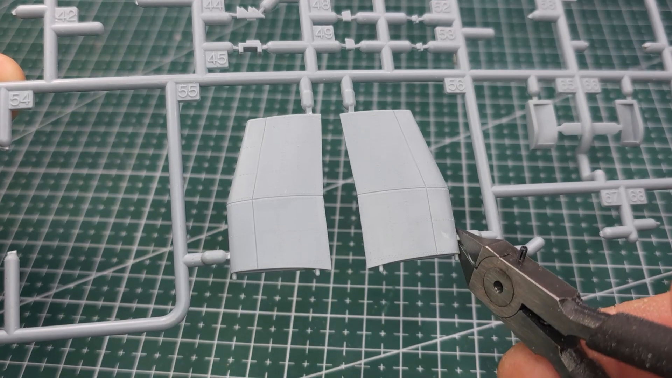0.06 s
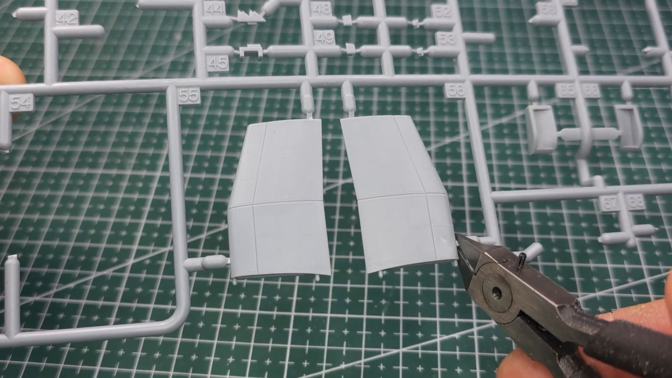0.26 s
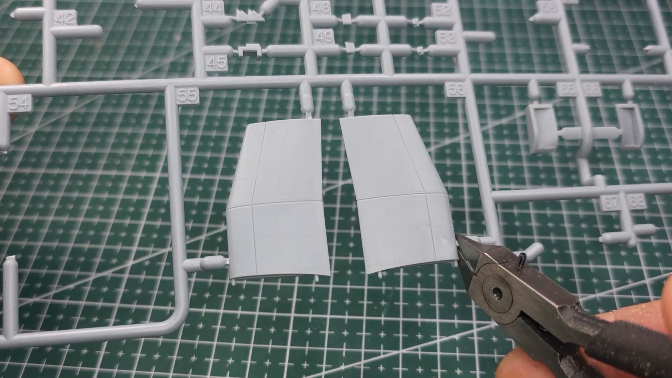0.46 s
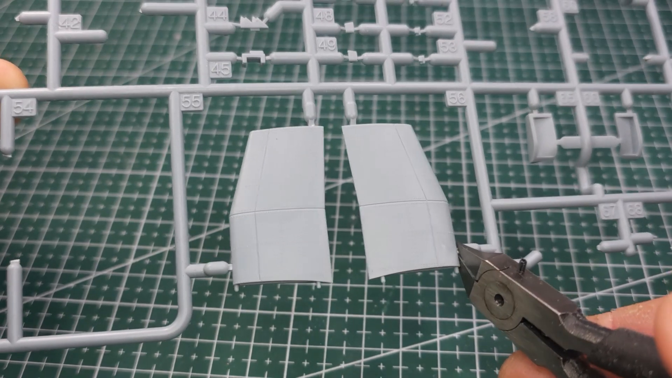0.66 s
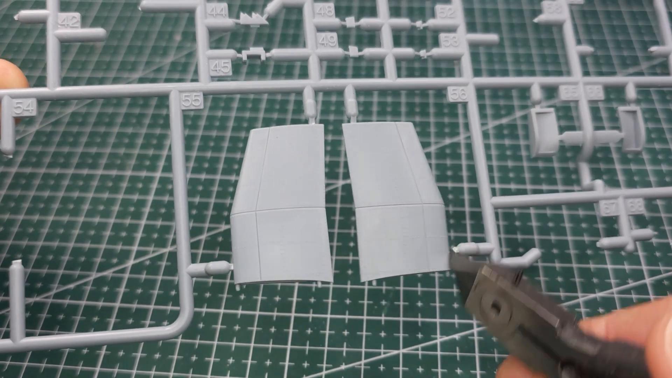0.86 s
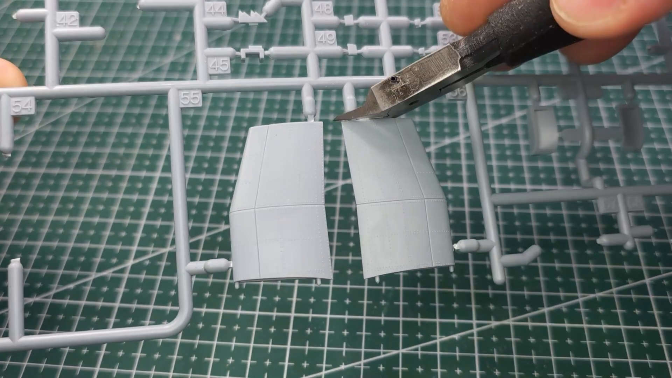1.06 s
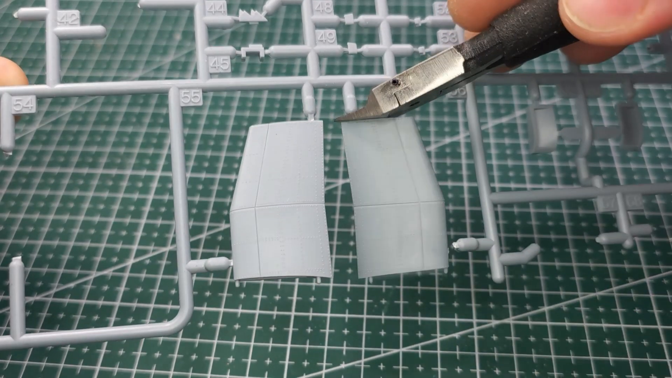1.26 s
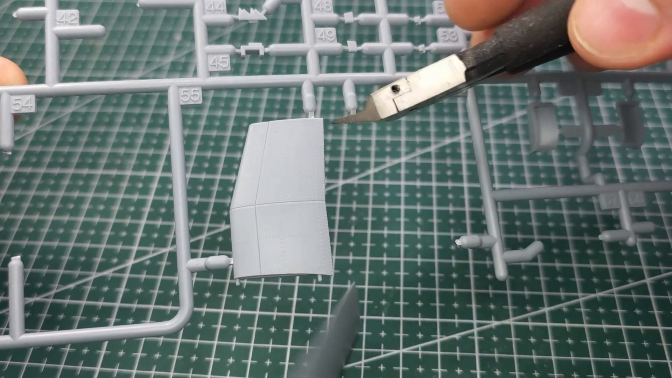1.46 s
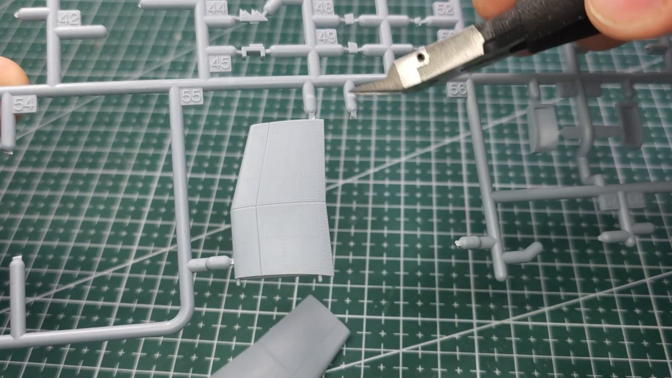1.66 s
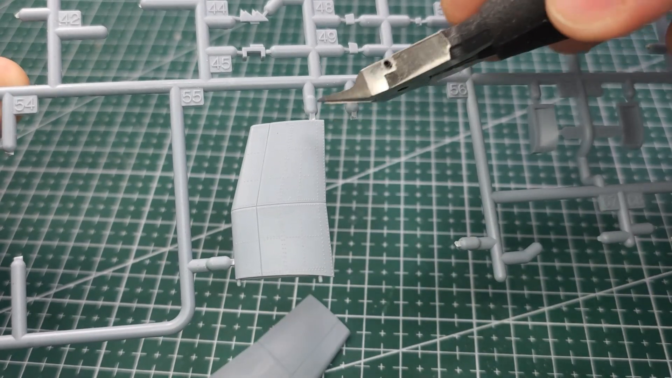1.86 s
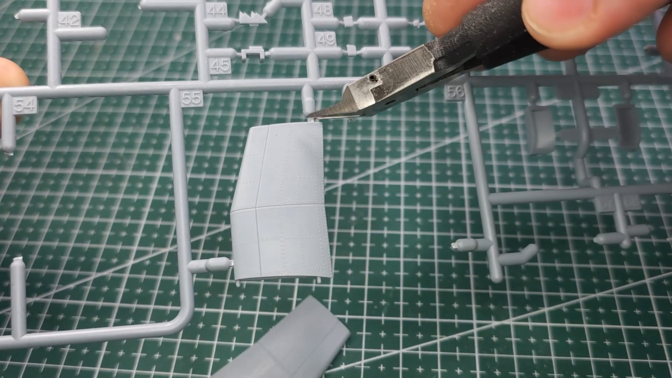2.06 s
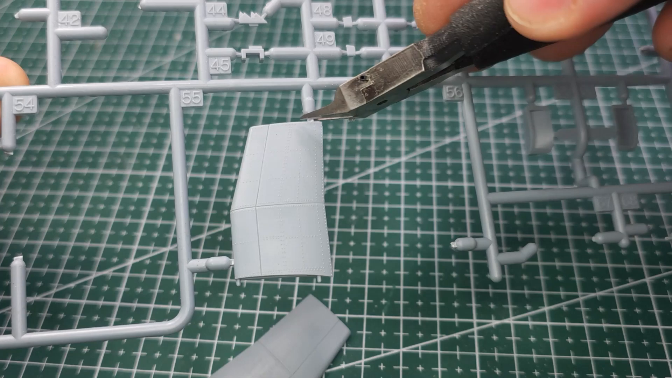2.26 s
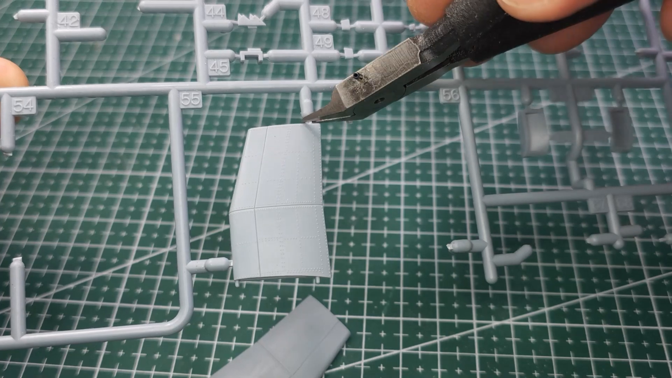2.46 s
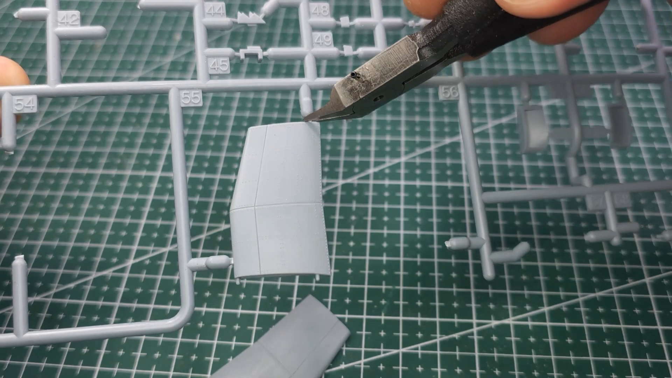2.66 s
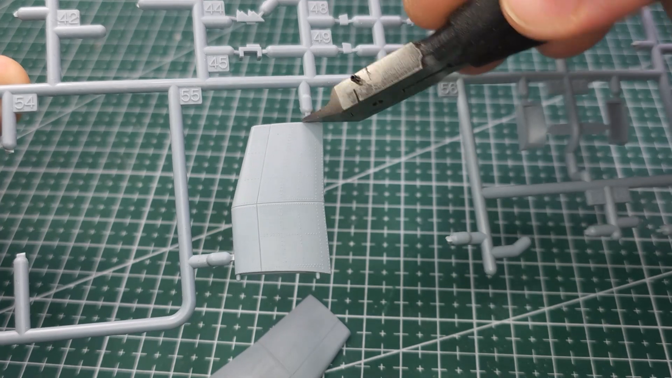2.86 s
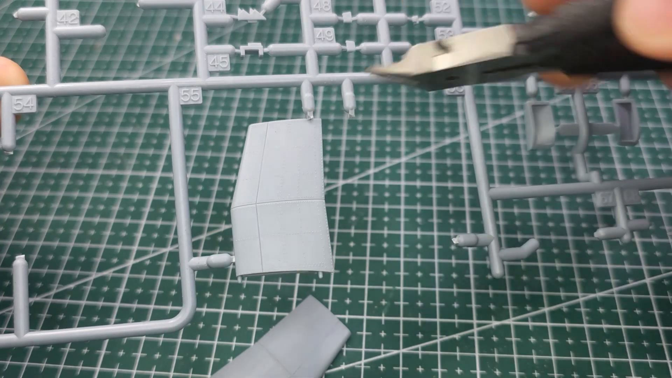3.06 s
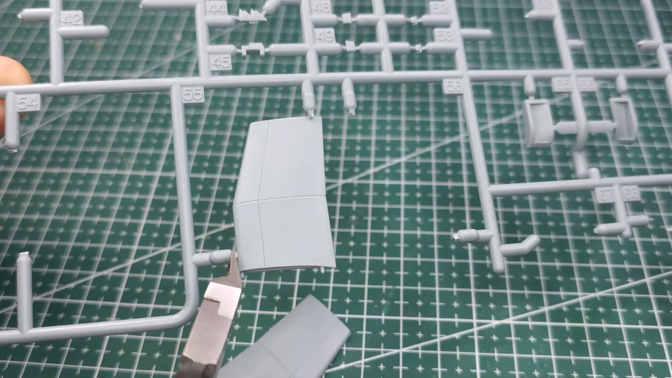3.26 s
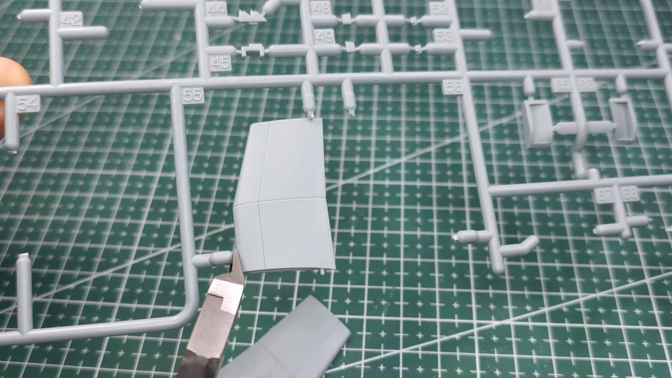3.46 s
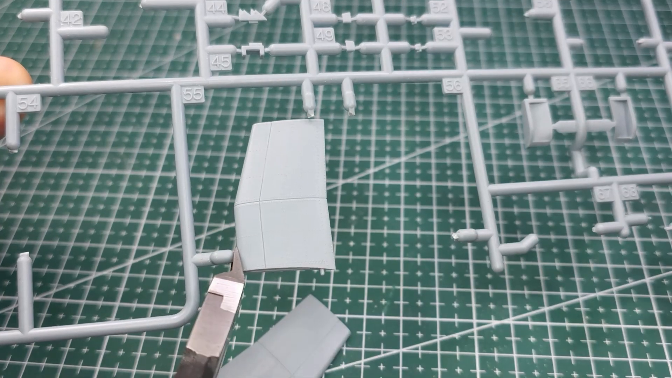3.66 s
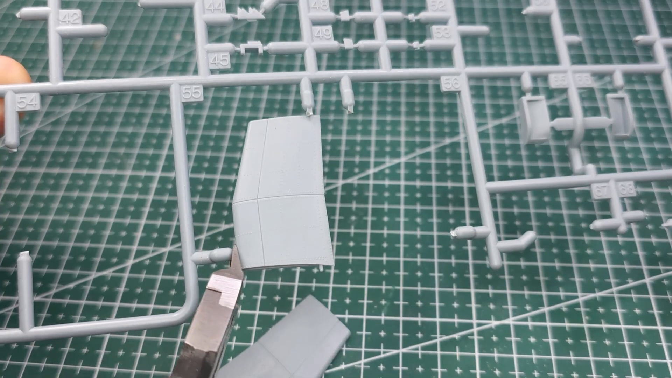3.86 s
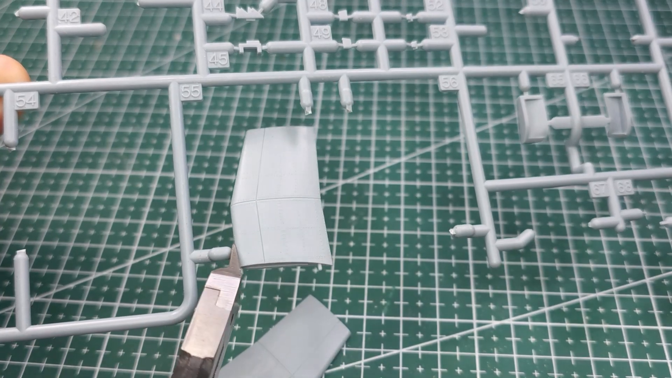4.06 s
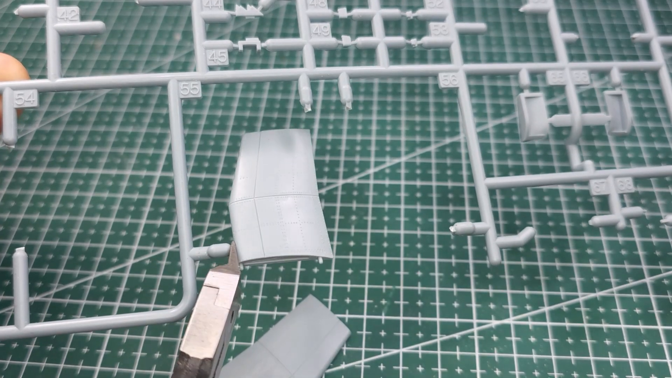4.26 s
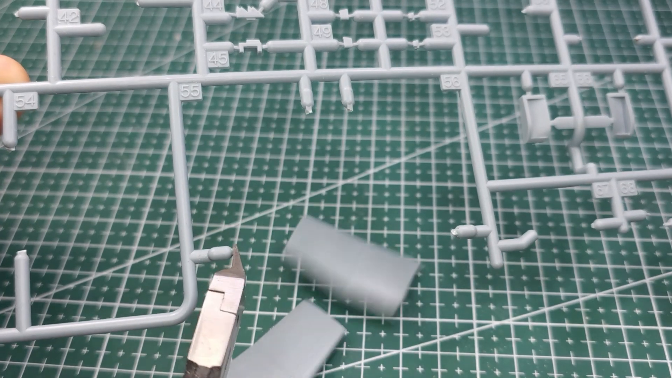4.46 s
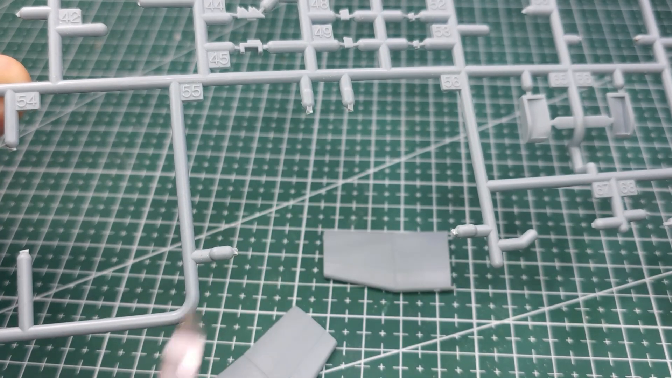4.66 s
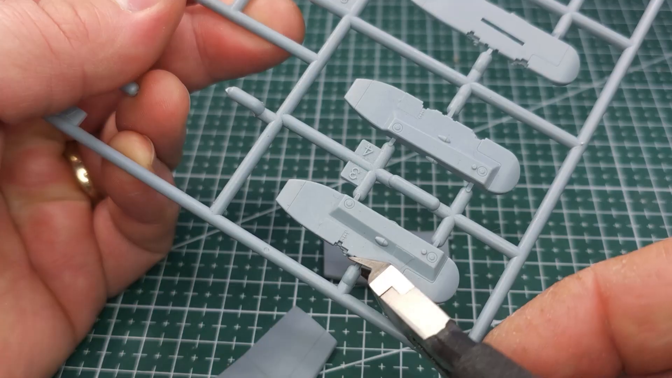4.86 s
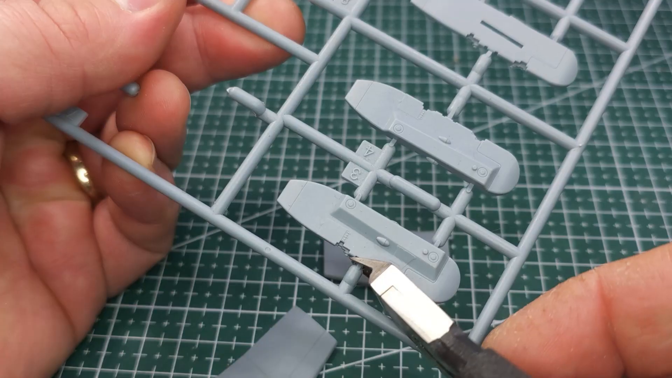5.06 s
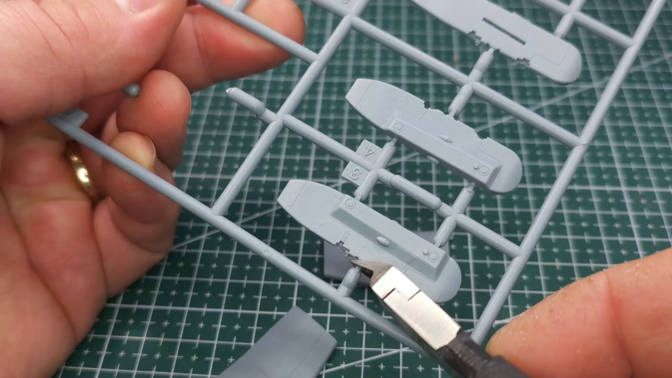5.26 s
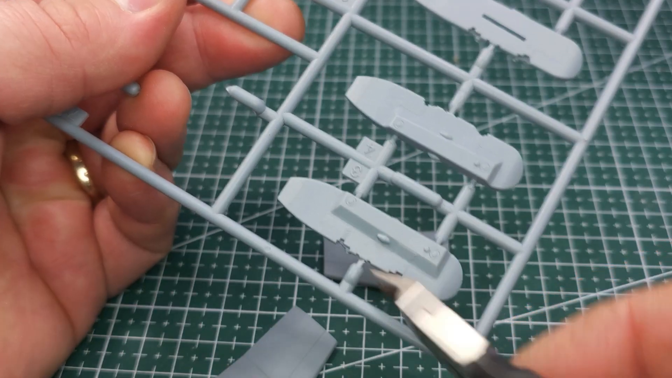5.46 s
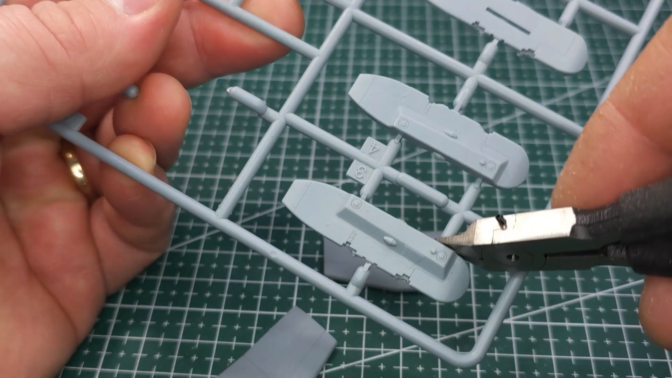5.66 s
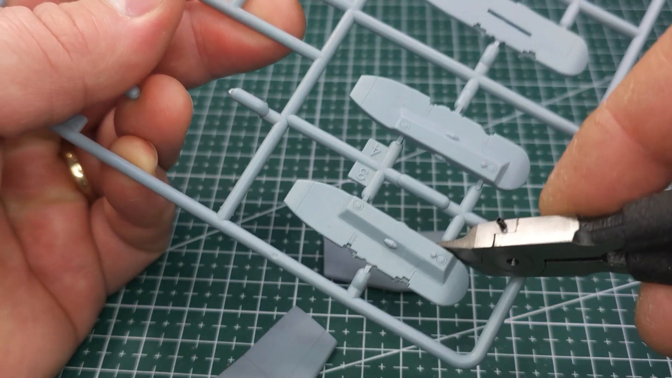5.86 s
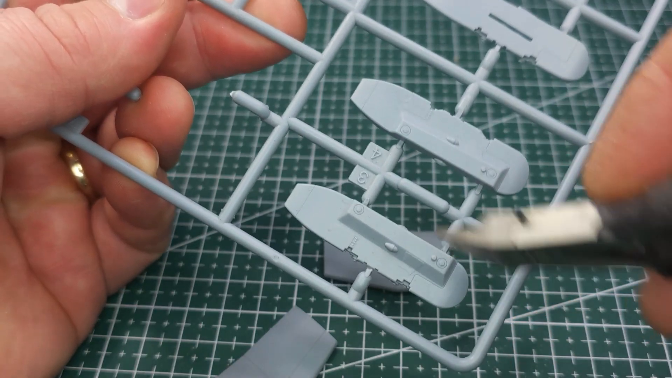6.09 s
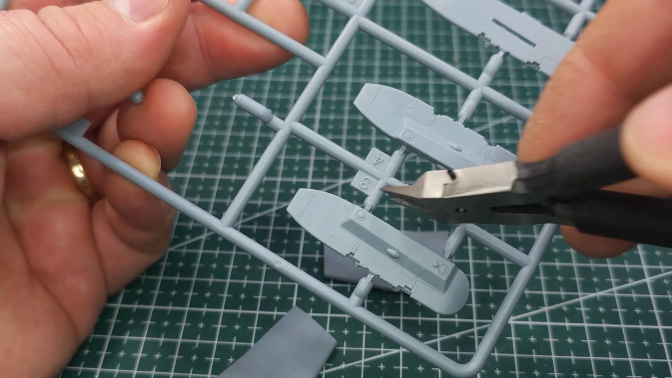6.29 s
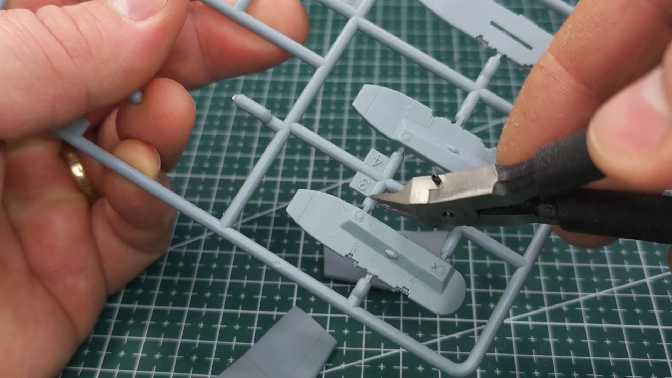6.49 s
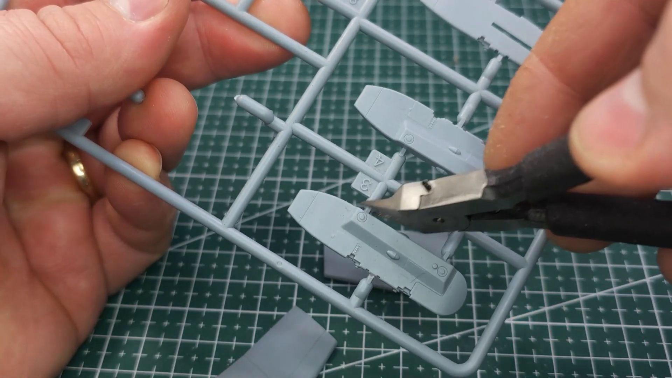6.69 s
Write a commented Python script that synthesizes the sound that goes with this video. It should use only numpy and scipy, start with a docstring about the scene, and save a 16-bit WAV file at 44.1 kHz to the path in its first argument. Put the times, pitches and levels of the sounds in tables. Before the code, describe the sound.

Seven crisp, unevenly spaced snaps sound as cutters break through a plastic parts frame, each with a slight rattle and a soft bump on the desk. After the second and fourth cuts, a light plastic panel bounces briefly on a mat. The jaws tick and scrape faintly in between, and the final cuts are weaker. The microphone is close, in a small room with a faint, steady rumble.

```python
"""Side cutters snip plastic parts off their frame, over a cutting mat in a small, quiet room. A low rumble runs
throughout. The jaws brush the plastic, then the first cut creaks and cracks, shaking the frame and thumping the
desk. After the second cut a freed panel drops and clatters on the mat. Two more cuts follow and a second panel
falls. Three last cuts end the scene. Between cuts the jaws brush and tick against the plastic, close to a
stereo microphone, and a faint tick sounds now and then."""
import sys
import numpy as np
from scipy import signal
from scipy.fft import rfft, irfft
from scipy.io import wavfile
from scipy.ndimage import uniform_filter1d

SR = 44100
rng = np.random.default_rng(int(sys.argv[2]) if len(sys.argv) > 2 else 0)


def store_pcm(level_fs):
    """Save levels as 16-bit WAV."""
    pcm = np.round(np.clip(level_fs, -1, 1) * 32767).astype(np.int16)
    wavfile.write(sys.argv[1], SR, np.atleast_2d(pcm).T)


N = 296793
LEN = 8192  # samples set aside for one short sound
T = np.arange(LEN) / SR

# The tone of the room's rumble. Each row: frequency in Hz, relative level in dB.
RUMBLE_TONE = [(12, -37.5), (20, -6), (62, 0.5), (87, -6), (196, -12), (260, -19.5), (291, -27.5),
               (326, -24.5), (444, -31), (541, -38), (588, -39.5), (1980, -53.5), (16800, -65)]
# How alike the rumble is in both microphones. Each row: frequency in Hz, likeness from 0 to 1.
RUMBLE_LIKENESS = [(60, .98), (130, .94), (290, .68), (640, 0.09), (1400, 0.089)]
# Jaws or fingers brush the plastic; the last row is a longer crunch of the cut at 6.508 s. Each row: time in
# seconds, peak in dB, centre pitch in Hz, width in octaves, fade time in seconds. A fade time (t60) is how long
# a sound takes to fall 60 dB.
BRUSHES = [(.63, -79.5, 5830, 5.1, .05), (0.934, -54.5, 3830, 6.1, 0.17), (2.929, -39, 2540, 2.9, 0.069),
           (3.09, -76, 12500, 1.3, 1), (3.520, -68, 7000, 0.75, 0.06), (4.786, -65, 10030, 1.33, .3),
           (5.437, -60, 10020, 1.5, 0.15), (5.964, -56, 8020, 2.2, .15), (6.518, -36.5, 1524, 3.1, 0.048)]
# Short ticks: most are the jaw tips touching the plastic, while those at 0.987 s and 5.588 s are just faint
# ticks. Each row reads like a row of BRUSHES.
TICKS = [(0.987, -46, 2500, 6.6, 0.0015), (1.908, -50, 9600, 0.97, 0.081), (2.933, -37.5, 7500, 2.3, 0.032),
         (3.189, -73, 5960, 3.27, 0.0091), (3.527, -52.5, 7260, 0.77, 0.043),
         (3.809, -75.5, 8970, 1.9, .02), (5.481, -52, 8020, 0.86, 0.069), (5.588, -59.5, 2960, 4, 0.0075),
         (5.988, -46.5, 3500, 1.2, 0.065)]
# The notes that frame and jaws ring at. Each row: pitch in Hz, level in dB, fade time in seconds.
FRAME_NOTES = [(322, -2.5, 0.056), (430, -5.5, 0.043), (563, -9.5, .02), (990, -5.5, 0.0057),
               (1140, 0.5, 0.015), (1340, 1, 0.02), (1520, 0, 0.027), (1840, -1, 0.024), (2170, 2, 0.023),
               (2576, -1.5, 0.017), (2917, -0.5, .015), (3260, -3.5, 0.02), (3857, -2.5, 0.012),
               (4240, -1, 0.0094), (4579, 0, 0.006), (4900, -2.5, 0.0066), (5600, 0.5, 0.0064),
               (6400, 2.5, 0.004), (7430, 1.5, 0.012), (8165, -5.5, 0.023), (8815, 1.5, 0.015),
               (9500, -8, 0.018), (9950, -7.5, .006), (11230, -2, .006), (12220, 0.5, 0.0087),
               (12970, -3.5, 0.012), (13190, 3.5, 0.0028), (13600, -2.5, 0.013), (13680, -3.5, 0.0098),
               (15000, -6.5, 0.0043), (15080, -3.5, 0.0071)]
# The cuts. Each row: time in seconds, peak in dB, brightness in dB per octave, boosted pitch in Hz,
# hollow note in dB, crack fade time in seconds, shake in dB, thump in dB, thump pitch in Hz,
# deep jolt in dB, desk ring in dB, left minus right in dB.
CUTS = [(0.771, -3.5, 1.5, 12500, -3, 0.019, -26, -31, 208.3, -43, -41.5, 4),
        (1.285, -19.5, -1.5, 6990, 3.5, 0.025, -34.5, -32, 322.4, -57, -47.5, 2),
        (2.747, -12, 0.5, 9500, 13.5, .012, -30.5, -31, 279, -59, -46.5, 0.2),
        (4.364, -6.5, 1.5, 8700, -4.5, 0.013, -31.5, -34.5, 128, -43, -57, 2),
        (5.230, -12, 2, 5600, -1, .017, -36, -46.5, 497, -57, -46, 2.5),
        (5.741, -20.5, -1, 3930, -15, .018, -41, -36.5, 258, -41.5, -38, 4),
        (6.508, -29.5, 1.5, 2210, 16, 0.013, -41, -66, 140, -69, -71.5, 6)]
# How strongly a crack wakes the frame's notes. Each row: pitch in Hz, level in dB.
CRACK_TONE = [(400, -29), (1150, -35.5), (2100, -24.5), (4000, -17), (6000, -24.5), (8600, -17.5),
              (11500, -21), (14300, -19)]
# The notes of the desk under the hands. Each row: pitch in Hz, level in dB, fade time in seconds.
DESK_NOTES = [(122, -2.5, 0.21), (152, -2.5, 0.14), (218, 0, .07), (276, 1.5, 0.073), (324, 1, 0.11),
              (472, -8.5, 0.081), (686, -9.5, 0.017), (810, -10, 0.031)]
# A panel lands on an edge or corner. Each row: time in seconds, knock in dB, ring in dB,
# brightness in dB (added to the top notes, taken from the low ones).
LANDINGS = [(1.3457, -18.5, -47.5, -7), (1.3538, -13, -34, -4.5), (1.37, -13, -29, 1),
            (1.3984, -20, -39.5, -1.5), (1.4202, -24, -52, -6.5), (1.4472, -21.5, -62, -23.5),
            (1.4638, -27.5, -43.5, -12.5), (1.4853, -25.5, -65, -19), (1.5326, -33, -57.5, -5),
            (1.5448, -17, -37, -4), (1.5478, -26.5, -33.5, 9), (1.5499, -15, -42.5, 6),
            (1.5651, -46, -48, -6), (1.598, -23, -41.5, 5), (1.628, -26.5, -46.5, 0),
            (1.6456, -33, -57, -4), (4.4542, -21.5, -37, -3.5), (4.4616, -15, -27.5, 1),
            (4.465, -19.5, -40, 2), (4.4698, -22, -35, -0.5), (4.48, -34.5, -44, 1),
            (4.496, -28.5, -50, -0.5), (4.5134, -25.5, -41.5, -2), (4.5162, -19, -37.5, -1),
            (4.532, -27, -42.5, -6), (4.5473, -31, -44, -3), (4.5561, -21, -37, -2.5),
            (4.5648, -18.5, -34.5, -3), (4.5802, -36, -45, -10), (4.5876, -38, -48, -1),
            (4.6025, -38, -52, -4), (4.6085, -29, -44, -1), (4.615, -27.5, -48, 5),
            (4.6301, -37, -56.5, -4), (4.6411, -39, -51.5, -9.5), (4.645, -30, -60, 5),
            (4.6495, -33, -61, -10)]
# The notes of a thin panel. Each row: group (rounds to 0 bending tone, 1 low, 2 middle, 3 top),
# pitch in Hz, level in dB, fade time in seconds.
PANEL_NOTES = [(0, 3070, 7, 0.11), (1.5, 3678, -9, 0.055), (1.02, 2100, 6.5, 0.0096),
               (2.32, 2375, -1, 0.012), (2.5, 2749, -1.5, 0.019), (1.2, 3300, 0, 0.013),
               (2.8, 3600, -5, .015), (1.15, 4490, -2.5, 0.012), (2, 5347, -7, 0.022),
               (2.001, 6800, -9, .015), (2.001, 6070, -7.5, 0.01221), (2.001, 8000, -7, 0.03),
               (2, 7602, 3.5, 0.027), (2.001, 8000, -6, .012), (2.002, 8590, 2, .015),
               (2.002, 9500, -12, .012), (3.3, 7900, -8.5, .015), (3, 14000, -12.5, 0.0195),
               (2.998, 8500, -14, 0.025), (2.998, 11000, -11.5, 0.0098), (3.001, 12860, -1.5, .015),
               (3, 13130, 3.5, .018), (3.001, 13760, 0.5, .02), (2.999, 14200, -7.5, 0.015),
               (3.002, 13000, -6.5, .012), (3.002, 12000, -1, .018)]
# The notes of mat and desk under a knock. Each row: pitch in Hz, level in dB, fade time in seconds.
MAT_NOTES = [(338, -32.5, 0.061), (704, -25, .025), (810, -25.5, .025), (960, -22.5, 0.018),
             (1086, -16.5, 0.029), (1228.5, -25.5, .025), (1398, -17.5, .025), (1720, -23.5, 0.023)]

SECOND_PANEL_S = 3  # later landings belong to the second panel
# Each pair: first panel, second panel.
KNOCK_HZ, KNOCK_S, PANEL_PAN_DB = (1233, 1146), (0.00048, 0.00069), (2.5, 1.5)
BEND_DB, LOW_DB, MID_DB, MAT_DB = (-20, -38), (-0.5, -1.5), (-0.5, 1.5), (1.5, 2.5)


def undb(db):
    """Turn decibels into a number to multiply by."""
    return 10 ** (np.asarray(db) / 20)


def fade(t60):
    """A curve that falls 60 dB in t60 seconds."""
    return np.exp(-np.log(1000) * T / np.maximum(t60, 1e-4))


def peak(sound, db):
    """Scale a sound so that its highest point is at this level."""
    return sound * undb(db) / np.abs(sound).max()


def ring(hz, db, t60, scatter_db, apart, size=1024):
    """A struck object's fading notes; strength and phase (apart, in radians) vary by microphone."""
    chance = rng.standard_normal((3, 2, len(hz), 1))
    hz, db, t60 = (np.asarray(column, float)[:, None] for column in (hz, db, t60))
    phase = np.pi * chance[0, 0] + apart * chance[1]
    t = T[:size]
    swell = undb(db - 60 * t / t60) * (1 - np.exp(-(1.7 * hz * t) ** 2))  # builds in about one cycle
    notes = undb(scatter_db * chance[2]) * swell * np.sin(2 * np.pi * hz * t + phase)
    return np.pad(notes.sum(axis=1), ((0, 0), (0, LEN // 2 - size)))


def grit(spread_db):
    """Noise of uneven grains, as from many small slips."""
    return rng.standard_normal(LEN) * undb(spread_db * rng.exponential(size=LEN))


def through(force, body):
    """The sound of a changing force pushing on a ringing body."""
    return signal.fftconvolve(body, force[None], axes=1)[:, :LEN]


def look_up(table, hz):
    """Read between the rows of a table whose first column is in Hz."""
    table_hz, values = np.transpose(table)
    return np.interp(np.log(hz), np.log(table_hz), values)


def add(out, sound, start_s, pan_db):
    """Mix a sound in, with the left side pan_db louder than the right."""
    first = int(start_s * SR)
    count = min(LEN, N - first)
    out[:, first:first + count] += (sound * undb([[pan_db / 2], [-pan_db / 2]]))[:, :count]


def rumble(level_db=-65.5, waver_db=0.5):
    """Distant low noise that wavers slowly, alike on both sides in the bass, over faint hiss."""
    hz = np.maximum(np.fft.rfftfreq(N, 1 / SR), 1)
    alike = look_up(RUMBLE_LIKENESS, hz)
    step = SR // 4
    waver = uniform_filter1d(np.repeat(rng.standard_normal(N // step + 1), step), step)[:N]
    shared, side = rfft(rng.standard_normal((2, N)))
    left_right = np.array([[1], [-1]])
    spectrum = np.sqrt(1 + alike) * shared + np.sqrt(1 - alike) * side * left_right
    noise = irfft(undb(look_up(RUMBLE_TONE, hz)) * spectrum, N)
    return noise * undb(level_db + waver_db * waver + 0.75 * left_right) / np.sqrt(np.mean(noise ** 2))


def touches(rows, rise_share):
    """A brush or tick: gritty rubbing swells and dies, and makes the frame ring."""
    hz, db, t60 = np.transpose(FRAME_NOTES)
    bass_cut_db = 25 * np.maximum(np.log2(950 / hz), 0)  # light touches hardly move the low notes
    out = np.zeros((2, N))
    for time_s, peak_db, centre_hz, octaves, fade_s in rows:
        rise_s = min(rise_share * fade_s, 0.033)
        lead_s = 3 * rise_s
        rising = np.exp(np.minimum(T - lead_s, 0) * 2 / rise_s)
        falling = undb(-60 * np.maximum(T - lead_s, 0) / fade_s)
        held_hz = hz * (1 + 0.028 * rng.standard_normal(len(hz)))  # each grip retunes the frame
        note_db = db - 12 * (np.log2(hz / centre_hz) / octaves) ** 2 - bass_cut_db
        body = ring(held_hz, note_db, 0.63 * t60, scatter_db=2.4, apart=1.0)
        rub = through(grit(3.07) * rising * falling, body)
        add(out, peak(rub, peak_db), time_s - lead_s, pan_db=3)
    return out


def desk_thump(hz, t60, rise_s):
    """One low note of the jolted desk, a little out of step between the microphones."""
    phase = np.array([[0.355], [-0.355]])
    return np.sin(2 * np.pi * hz * T + phase) * fade(t60) * (1 - np.exp(-T / rise_s))


def cuts(creak_s=0.045):
    """The plastic creaks in the jaws, then breaks: the crack rings the frame and jolts the desk."""
    hz, db, t60 = np.transpose(FRAME_NOTES)
    out = np.zeros((2, N))
    before, after = np.maximum(creak_s - T, 0), np.maximum(T - creak_s, 0)
    # the creak grows slowly, then fast just before the break
    creak_swell = (np.exp(-before / 0.0024) + undb(-24) * np.exp(-before / 0.011)) * (before > 0)
    # the released frame springs back and rattles against jaws and fingers
    shake = undb(-60 * after / 0.1) * (1 - np.exp(-(after / 0.0042) ** 2))
    for (time_s, peak_db, brightness, boost_hz, hollow_db, crack_s,
         shake_db, thump_db, thump_hz, jolt_db, desk_db, pan_db) in CUTS:
        creak = undb(-22 - 0.4 * peak_db) * creak_swell  # weaker cracks hide less of the creak
        crack = (before == 0) * (undb(-60 * after / crack_s) + 1.773 * np.exp(-after / 0.000061))
        boost_db = 8.5 * np.exp(-(np.log2(hz / boost_hz) / 0.6) ** 2)
        crack_db = look_up(CRACK_TONE, hz) + brightness * np.log2(hz / 4000) + boost_db
        # flat parts still on the frame give a hollow note
        hollow = hollow_db * np.exp(-(np.log2(hz / 1170) / 0.45) ** 2)
        held_hz = hz * (1 + 0.011 * rng.standard_normal(len(hz)))  # each cut retunes the frame
        cracked = ring(held_hz, db + crack_db + hollow, t60, scatter_db=0.95, apart=0.71)
        rattle_db = db + 0.6 * hollow - 4 * np.log2(hz / 3500) ** 2
        shaken = ring(held_hz, rattle_db, 0.36 * t60, scatter_db=0.85, apart=0.6)  # fingers damp it
        snap = peak(through(grit(2.0) * (creak + crack), cracked), peak_db)
        rattle = peak(through(grit(2.3) * shake, shaken), shake_db)
        add(out, snap + rattle, time_s - creak_s, pan_db)
        push = grit(0.98) * fade(0.016)
        desk = ring(*np.transpose(DESK_NOTES), scatter_db=2.4, apart=0.93, size=3072)
        thump = peak(desk_thump(thump_hz, t60=0.019, rise_s=0.0033), thump_db)
        jolt = peak(desk_thump(hz=70, t60=0.061, rise_s=0.0028), jolt_db)
        add(out, peak(through(push, desk), desk_db) + thump + jolt, time_s, pan_db=1.5)
    return out


def air_knock(hz, width_s):
    """Air squeezed from under a curved panel: a short, hollow puff and a weaker rebound."""
    return sum(undb(db) * np.cos(2 * np.pi * hz * (T - at_s)) * np.exp(-((T - at_s) / width_s) ** 2)
               for at_s, db in ((0.001, -1), (0.0027, -16)))


def clatter(group_db, mat_db):
    """A panel's edge strikes and skids, so both the panel and the mat ring."""
    group, hz, db, t60 = np.transpose(PANEL_NOTES)
    force = grit(3.1) * (fade(0.023) + undb(-11.5) * fade(0.07)) * (1 - np.exp(-T / 0.00019))
    note_db = db + group_db[np.rint(group).astype(int)]
    # each contact point also wakes many small, short notes of its own
    small_hz = 1800 + 470 * (np.arange(30) + rng.uniform(size=30))
    small_db = np.interp(np.log(small_hz), np.log([3200, 7000, 12500]), group_db[1:]) - 3.5
    body = (ring(hz, note_db, t60, scatter_db=2.2, apart=0.91, size=2560)
            + ring(small_hz, small_db, np.full(30, 0.008), scatter_db=1.0, apart=0.91, size=512)
            + undb(mat_db) * ring(*np.transpose(MAT_NOTES), scatter_db=2.1, apart=0.22, size=1536))
    sound = through(force, body)
    return sound * np.sqrt(np.sum(body ** 2) / np.sum(sound ** 2))  # same energy, however it skids


def falling_panels():
    """Two freed panels bounce on the mat; after each landing they rock back once, softly."""
    out = np.zeros((2, N))
    landings = np.array(LANDINGS)
    late, soft = rng.standard_normal((len(landings), 2)).T
    delay_s, softer_db = 0.0087 * np.exp(0.3 * late), -16.5 + 3 * soft
    rebounds = landings + np.transpose([delay_s, softer_db, softer_db, np.zeros_like(soft)])
    times = landings[:, 0]
    first_landing_s = times.min(), times[times > SECOND_PANEL_S].min()
    for time_s, knock_db, ring_db, bright_db in np.vstack([landings, rebounds]):
        panel = int(time_s > SECOND_PANEL_S)
        knock_hz = KNOCK_HZ[panel] * (1 + 0.06 * rng.standard_normal())
        pan_db = PANEL_PAN_DB[panel] + 3 * rng.standard_normal()
        # the bending tone weakens as the panel settles on the mat
        bend_db = knock_db + BEND_DB[panel] - 82 * (time_s - first_landing_s[panel])
        low_db = ring_db + LOW_DB[panel] - bright_db
        group_db = np.array([bend_db, low_db, ring_db + MID_DB[panel], ring_db + bright_db])
        knock = undb(knock_db) * air_knock(knock_hz, KNOCK_S[panel])
        add(out, knock + clatter(group_db, knock_db + MAT_DB[panel]), time_s, pan_db)
    return out


def room_echo(dry, level_db=-22.5):
    """Walls and desk send back a short, blurred echo."""
    noise = rng.standard_normal((2, LEN))
    low = signal.sosfilt(signal.butter(2, 3000, fs=SR, output="sos"), noise)
    tail = low * fade(0.14) + undb(-7) * (noise - low) * fade(0.15)
    early = 1 + 0.83 * fade(0.026)  # near surfaces answer first and strongest
    tail *= early * (1 - np.exp(-(T / 0.012) ** 2))
    tail *= undb(level_db) / np.sqrt(np.sum(tail ** 2, axis=1, keepdims=True))
    return signal.fftconvolve(tail, dry, axes=1)[:, :N]


def scene():
    """Everything on the desk, its echo and the rumble."""
    desk = cuts() + falling_panels() + touches(BRUSHES, rise_share=0.19) + touches(TICKS, rise_share=0.05)
    desk[1] = np.roll(desk[1], 8)  # the right microphone hears the desk 8 samples later
    return desk + room_echo(desk) + rumble()


def record(dry, microphone_hz=16000, top_hz=16900):
    """The microphone fades above its range and the recorder cuts the highest treble."""
    heard = signal.sosfilt(signal.cheby1(6, 0.5, microphone_hz, fs=SR, output="sos"), dry)
    return signal.sosfilt(signal.ellip(10, 0.2, 80, top_hz, fs=SR, output="sos"), heard)


dry = scene()
out = record(dry)
store_pcm(out)
```